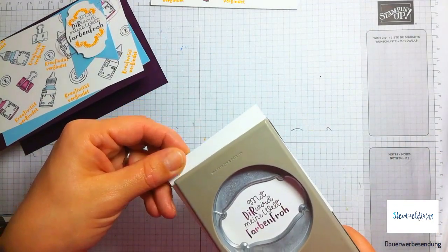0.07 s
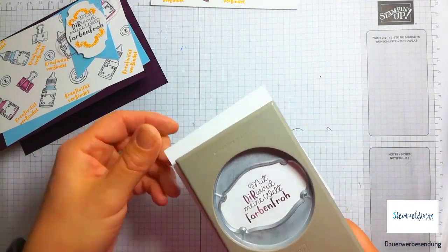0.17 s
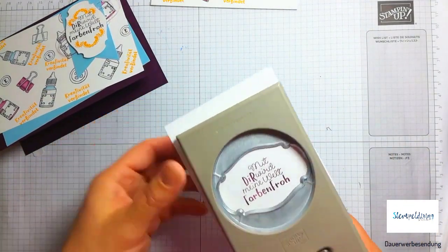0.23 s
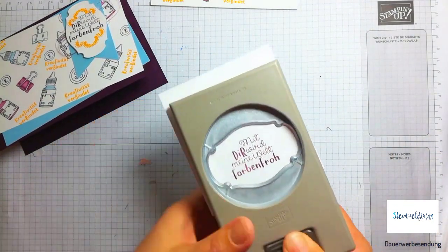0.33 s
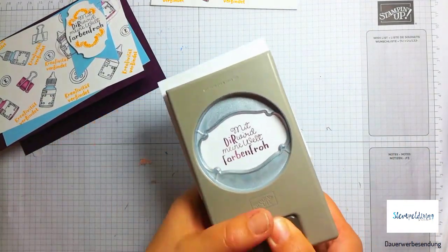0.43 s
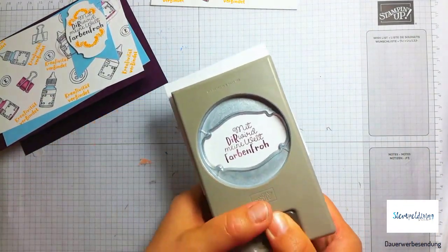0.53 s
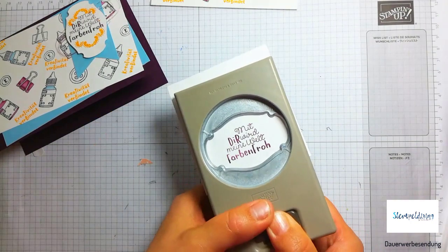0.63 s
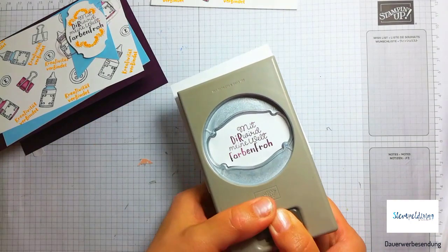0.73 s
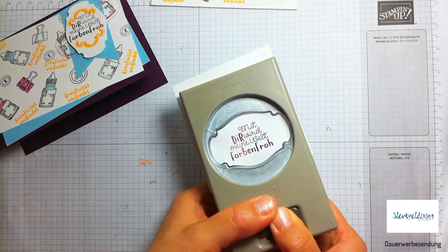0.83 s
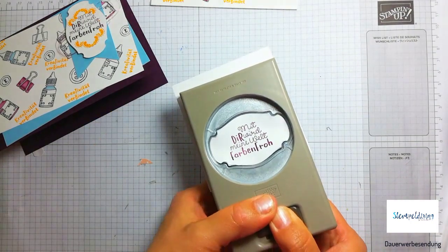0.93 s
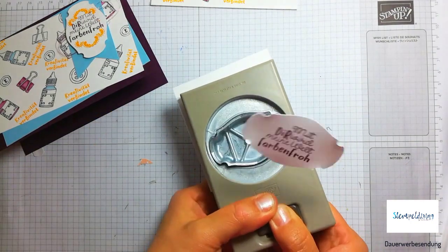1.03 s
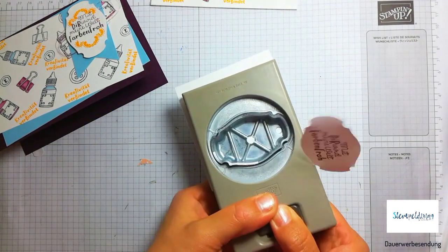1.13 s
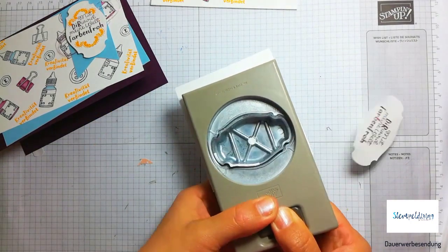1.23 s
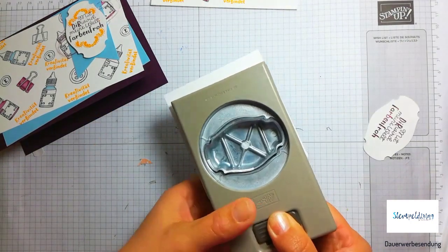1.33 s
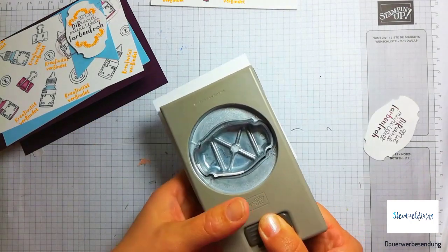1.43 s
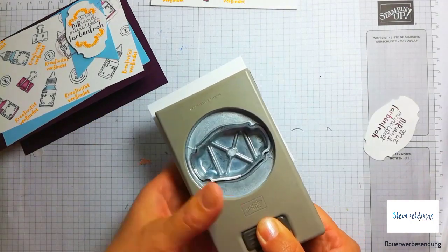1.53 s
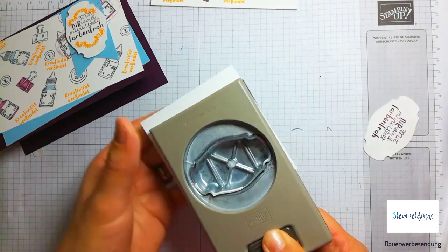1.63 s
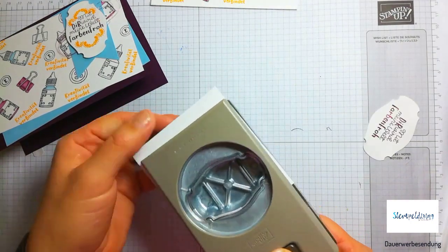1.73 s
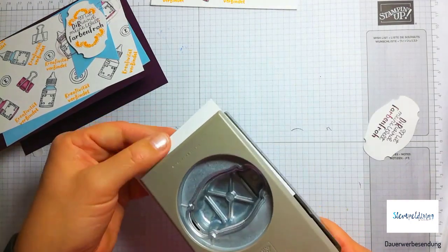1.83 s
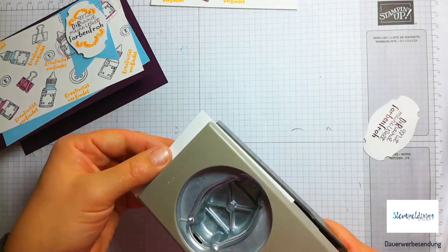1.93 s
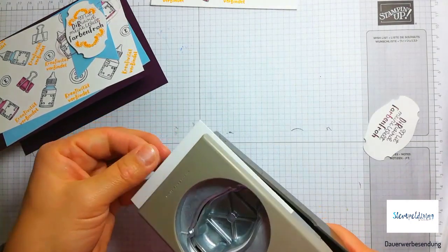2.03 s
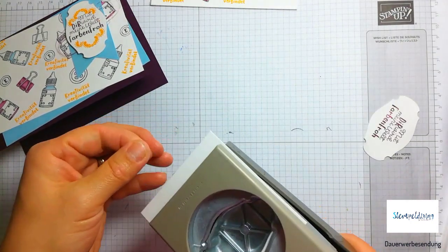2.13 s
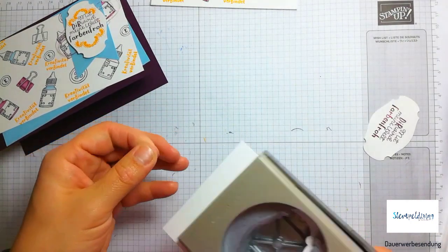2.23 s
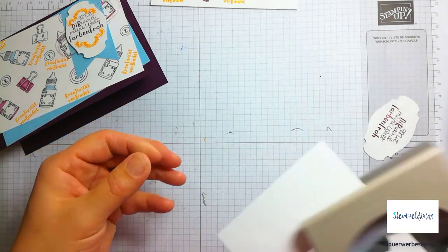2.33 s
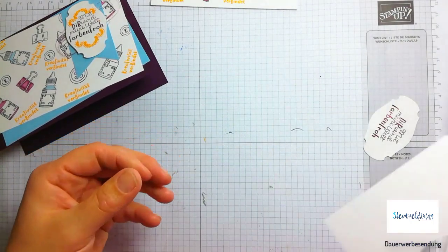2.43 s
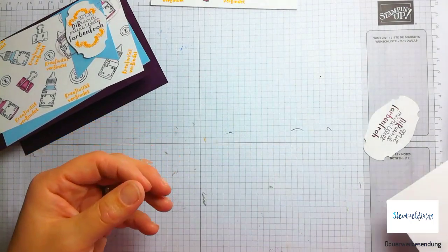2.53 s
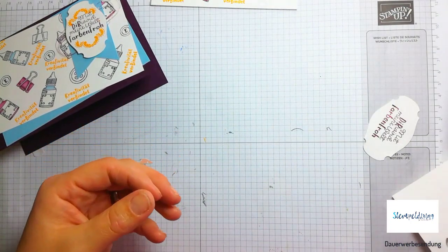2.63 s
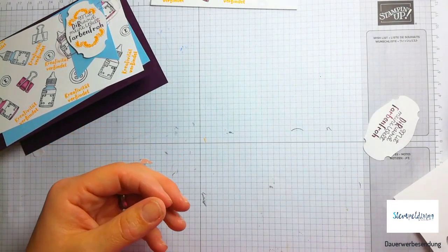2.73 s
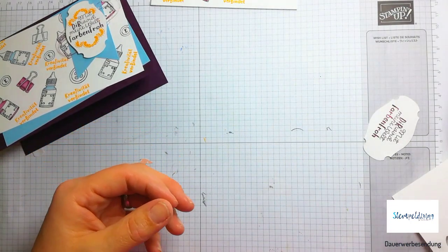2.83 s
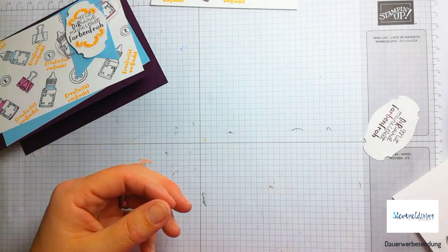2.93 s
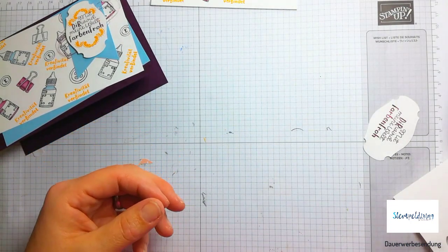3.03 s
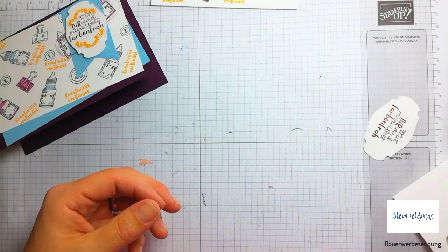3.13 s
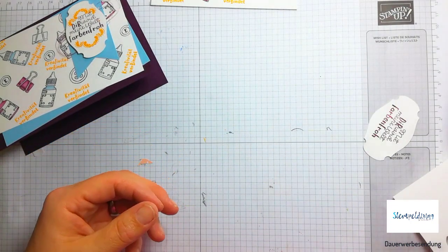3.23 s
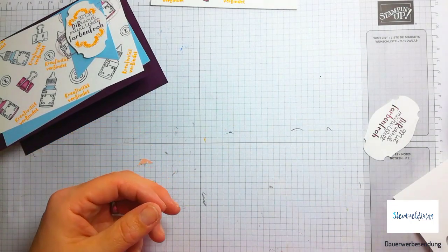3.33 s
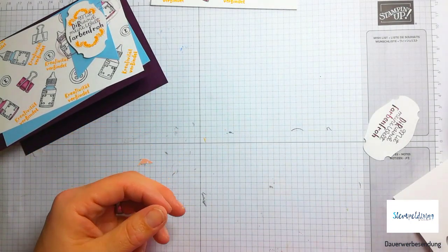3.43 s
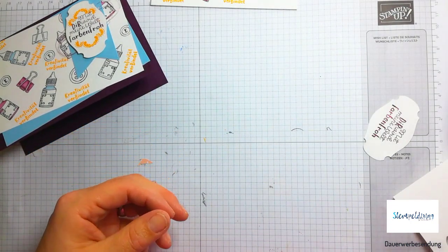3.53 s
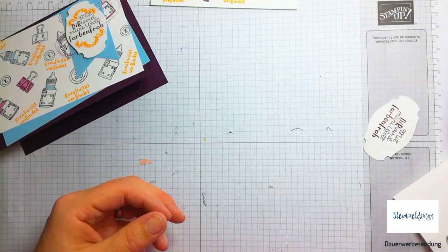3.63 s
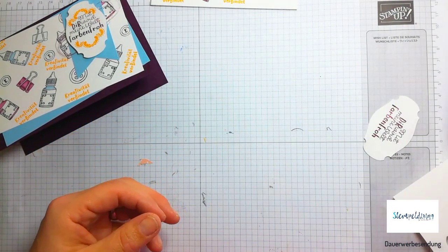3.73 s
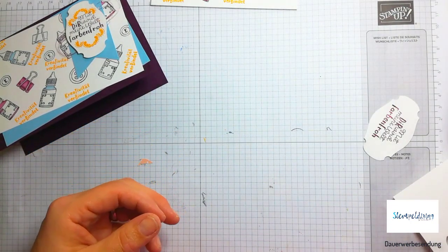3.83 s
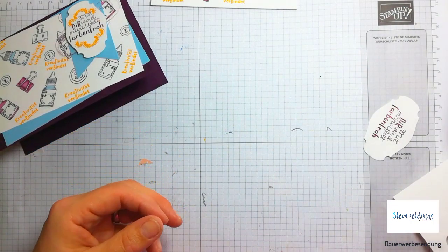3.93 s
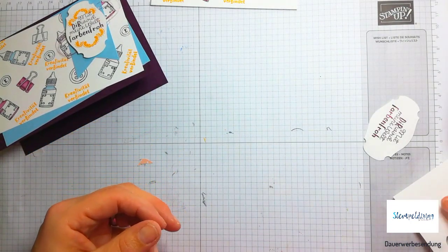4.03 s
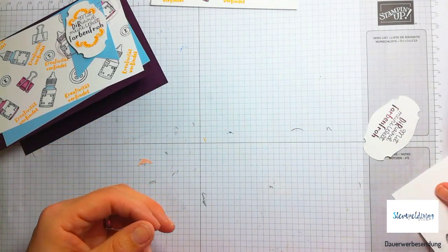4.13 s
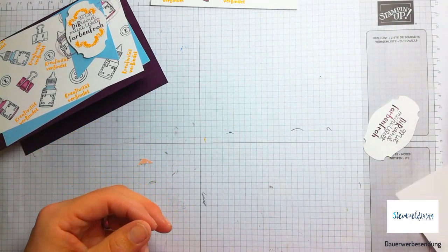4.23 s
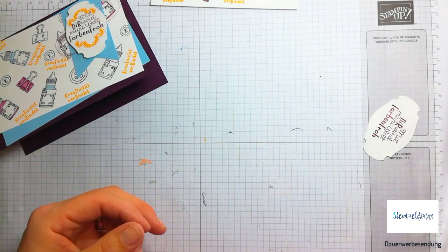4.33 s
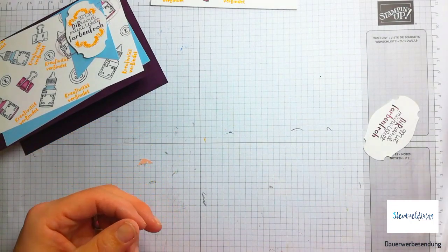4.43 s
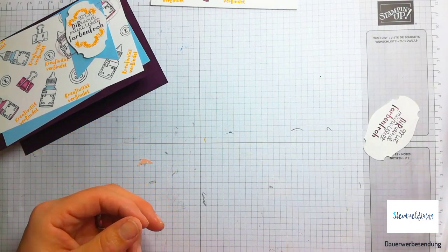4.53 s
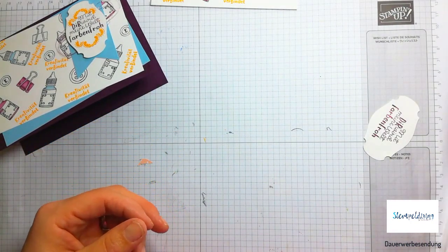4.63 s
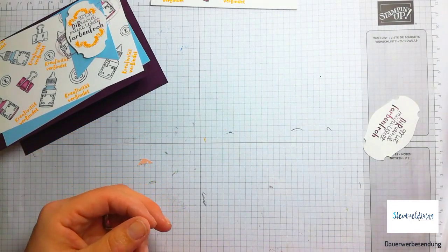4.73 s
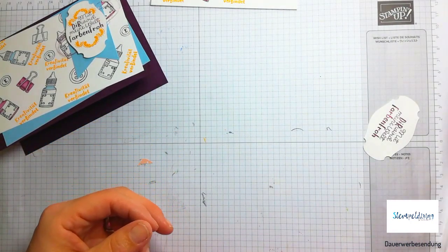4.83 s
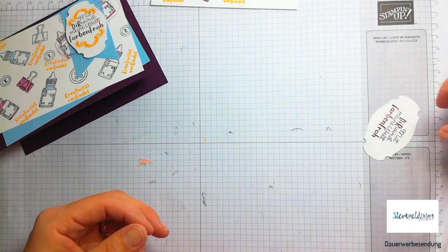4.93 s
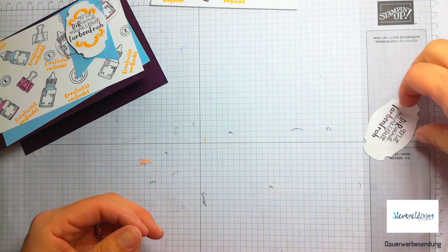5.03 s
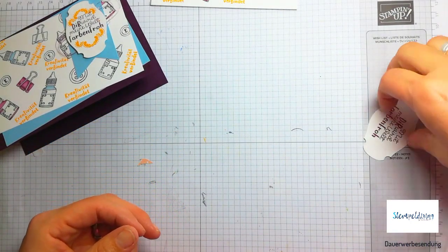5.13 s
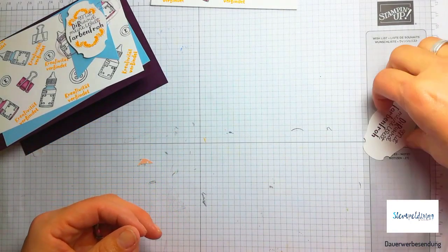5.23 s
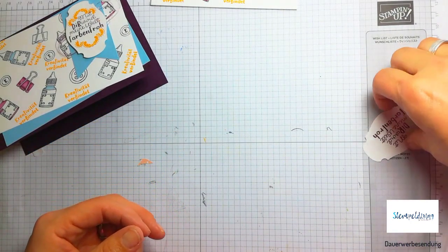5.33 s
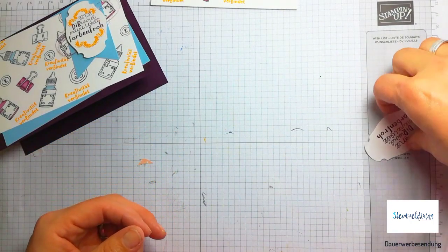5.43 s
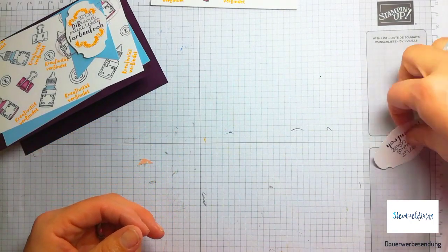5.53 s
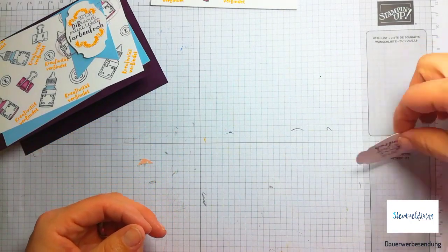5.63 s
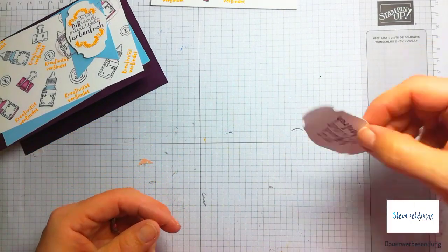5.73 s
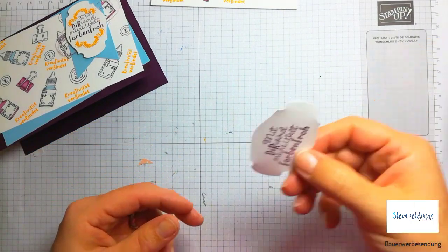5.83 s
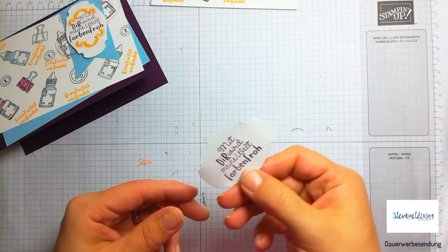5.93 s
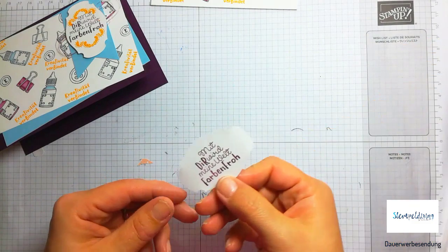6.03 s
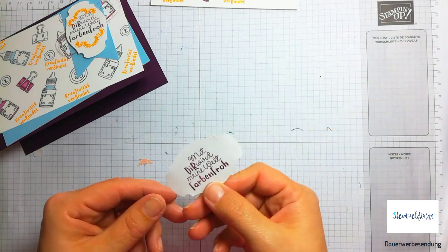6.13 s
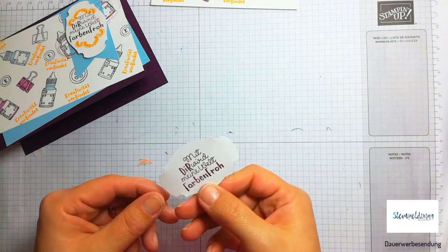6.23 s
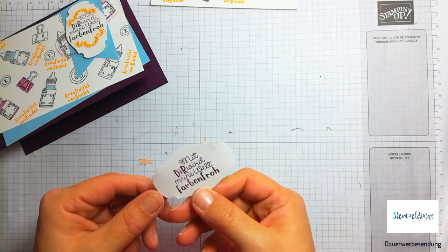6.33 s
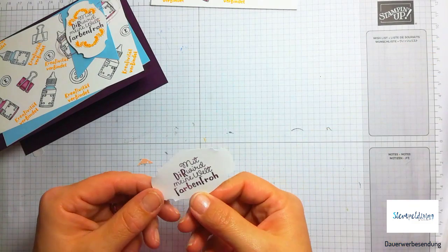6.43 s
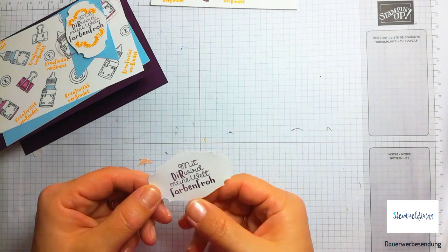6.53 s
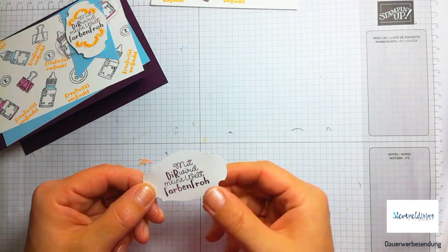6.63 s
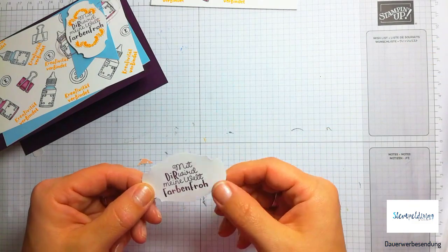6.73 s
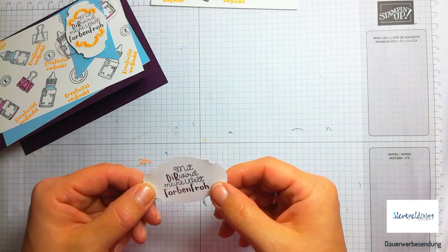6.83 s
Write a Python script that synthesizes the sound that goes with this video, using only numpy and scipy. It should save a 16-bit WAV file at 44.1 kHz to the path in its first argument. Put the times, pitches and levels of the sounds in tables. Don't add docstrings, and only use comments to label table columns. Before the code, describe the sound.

Stepped crackling, one sharp metallic snap with a brief spring ring, papery scrapes, a wobbling set-down on wood, card flicks, and faint fingertip rubbing in a quiet room.

```python
import sys
import numpy as np
from scipy import signal
from scipy.fft import rfft, irfft
from scipy.io import wavfile
from scipy.ndimage import uniform_filter1d

SR = 44100
rng = np.random.default_rng(int(sys.argv[2]) if len(sys.argv) > 2 else 0)


def put_to_file(sound):
    columns = np.atleast_2d(sound).T
    safe = np.clip(columns, -1, 1)
    whole_steps = np.round(safe * 32767)
    wavfile.write(sys.argv[1], SR, whole_steps.astype(np.int16))


def invert_db(x):
    u = np.asarray(x, float) / 20
    return 10 ** u


N = 303849
TIME = np.arange(N) / SR


def drift(rate_hz):
    points = rng.standard_normal(int(N / SR * rate_hz) + 2)
    return np.interp(TIME * rate_hz, np.arange(len(points)), points)


def resonance(x, hz, width_hz):
    r = np.exp(-np.pi * width_hz / SR)
    b = [(1 - r * r) / 2, 0, (r * r - 1) / 2]
    a = [1, -2 * r * np.cos(2 * np.pi * hz / SR), r * r]
    return signal.lfilter(b, a, x + 1e-18)


def ring(clicks, hz, t60_s):
    r = invert_db(-60 / (t60_s * SR))
    w = 2 * np.pi * hz / SR
    return signal.lfilter([0, np.sin(w)], [1, -2 * r * np.cos(w), r * r], clicks + 1e-18)


def struck(times_s, levels_db, modes, soft_hz):
    push = np.zeros(N)
    push[(np.array(times_s) * SR).astype(int)] = invert_db(np.array(levels_db))
    push = signal.lfilter(*signal.butter(1, soft_hz, fs=SR), push)
    return sum(invert_db(db) * (-1) ** k * ring(push, hz, t60_s) for k, (hz, db, t60_s) in enumerate(modes))


def above(x, hz):
    return signal.sosfilt(signal.butter(4, hz, "high", fs=SR, output="sos"), x)


def grit(grain_db):
    shared, own = rng.standard_normal(N), rng.standard_normal((2, N))
    x = (shared + 1.8 * own) * invert_db(grain_db * rng.standard_normal(N))
    return x / x.std()


def body(force, modes, gain):
    busy = np.flatnonzero(np.abs(force[0]) > 1e-9)
    part = slice(busy[0], busy[-1] + SR // 10)
    out = np.zeros((2, N))
    for k, (hz, width_hz, db) in enumerate(modes):
        driven = force[:, part] * invert_db(db) * gain(hz)[part]
        out[:, part] += (-1) ** k * resonance(resonance(driven, hz, width_hz), hz, 2 * width_hz)
    return out


COLOUR_HZ = [800, 1700, 3700, 9000]


def colour_db(hz, weight_db, edge_db, low_mid):
    bass, mid, _, treble = [np.interp(np.log(hz), np.log(COLOUR_HZ), row) for row in np.eye(4)]
    share, offset_db = low_mid
    top = treble * max(hz / 9000, 1) ** .8
    return bass * weight_db + mid * (share * weight_db + offset_db) + top * edge_db


def cracks(events, modes, low_mid, grain_db):
    s, peak_db, weight_db, edge_db, ms = np.transpose(sorted(events))
    owner = np.maximum(np.searchsorted(s, TIME) - 1, 0)
    age = (TIME - s[owner]) / (np.maximum(ms, .3) / 1000)[owner]
    force = grit(grain_db) * invert_db(peak_db)[owner] * np.exp(-np.abs(age)) * (age > 0)

    def gain(hz):
        chance_db = rng.standard_normal(len(s))
        return invert_db(colour_db(hz, weight_db, edge_db, low_mid) + chance_db)[owner]

    return body(force, modes, gain)


def friction(strokes, modes, low_mid, surge_db, edge_db, steady=()):
    stroke_depth_db, pointed, flat = 29, 1.2, 5
    slow_sheen = .14
    s, rise_s, fall_s, peak_db, weight_db = np.transpose(list(strokes) + list(steady))[:, :, None]
    rounding = np.array([pointed] * len(strokes) + [flat] * len(steady))[:, None]
    t = TIME[::32]
    away = np.where(t < s, (s - t) / np.maximum(rise_s, .002), (t - s) / np.maximum(fall_s, .002))
    each_db = peak_db - stroke_depth_db * away ** rounding
    owner, level_db = each_db.argmax(0), each_db.max(0)
    sheen_db = edge_db + slow_sheen * np.minimum(peak_db[owner, 0] - level_db, 40)
    weight_db = uniform_filter1d(weight_db[owner, 0], size=20)
    level_db, sheen_db, weight_db = [np.interp(TIME, t, c) for c in (level_db, sheen_db, weight_db)]
    force = grit(grain_db=2.5) * invert_db(level_db + surge_db * drift(120)) * (level_db > -115)
    return body(force, modes, lambda hz: invert_db(colour_db(hz, weight_db, sheen_db, low_mid) + 2.5 * drift(30)))


def placed(x, pan_db, lag_samples, treble_left):
    x = x * invert_db(np.array([[pan_db / 2], [-pan_db / 2]]))
    x = x + treble_left * np.array([[1], [-1]]) * above(x, hz=4991)
    return np.array([np.roll(x[0], lag_samples), x[1]])


# (frequency [Hz], width [Hz], level [dB])
RUMBLE = [(28.8, 7.8, -9.5), (52.8, 16, -3.5), (119, 32, -2.5), (133.5, 4.3, -3.5), (171, 12, -4.5),
          (254.5, 130, -21.5)]
# (time [s], rise [dB], half length [s])
SHIFTS = [
    (0.135, 9, 0.13),
    (0.9, 8, 0.1),
    (1.78, 9, 0.13),
    (2.606, 7, .35),
    (3.19, 16, .06),
    (3.357, 13.5, .12),
    (3.697, 6.5, 0.41),
    (5.427, 4.5, 0.54),
    (6.8, 3.5, .5),
]


def rumble():
    out = np.zeros((2, N))
    swell_db = -6.5 + sum(db * np.exp(-((TIME - s) / half_s) ** 2) for s, db, half_s in SHIFTS)
    for hz, width_hz, db in RUMBLE:
        shared, own = rng.standard_normal(N), rng.standard_normal((2, N))
        mode = resonance(resonance(shared + hz / 700 * own, hz, width_hz), hz, 2 * width_hz)
        level_db = db + swell_db * np.clip(hz / 110, 0, 1) + 2 * drift(1.5)
        out += invert_db(level_db) * invert_db(-66.0) * mode / mode.std()
    return out


# (frequency [Hz], density [dB per Hz])
HISS = [(180, -30.5), (300, -7.5), (526, -8.5), (696, -6.5), (756, -9), (1560, -9.5), (9760, -15),
        (11900, -13.5), (12900, -21.5), (15500, -36)]


def hiss():
    hz = np.maximum(np.fft.rfftfreq(N, 1 / SR), 1)
    knot_hz, knot_db = np.transpose(HISS)
    colour = invert_db(np.interp(np.log(hz), np.log(knot_hz), knot_db))
    noise = irfft(rfft(rng.standard_normal((2, N))) * colour, N)
    return invert_db(-84 + 6.5 + .5 * drift(1.3)) * noise / noise.std()


# (frequency [Hz], t60 [s], level [dB])
ROOM = [(300, 0.088, -6), (830, 0.32, -7.5), (2000, 0.065, -10.5), (4200, 0.26, -7), (8500, 0.25, -7),
        (12953, 0.33, -15)]


def room(x):
    t = np.arange(SR // 2) / SR
    tail = np.zeros((2, len(t)))
    for hz, t60_s, db in ROOM:
        noise = rng.standard_normal(tail.shape) + 700 / hz * rng.standard_normal(len(t))
        band = resonance(noise / noise.std(), hz, 2.2 * hz) * invert_db(-60 * t / t60_s)
        band *= np.clip(t / 0.012, 0, 1)
        tail += invert_db(db) * band / np.sqrt(t60_s * SR / 14)
    return signal.fftconvolve(x[None], tail, axes=1)[:, :N]


# (time [s], upper modes [dB], lowest modes [dB])
THUMPS = [
    (1.002, -40.5, -46),
    (3.012, -33, -36.5),
    (3.021, -42, -70),
    (3.051, -46, -41.5),
    (3.171, -34.5, -57),
    (3.203, -35, -53),
    (3.351, -39, -60),
    (4.13, -62, -84),
    (4.262, -58, -85),
]
# (frequency [Hz], level [dB], t60 [s])
DESK_LOW = [(127, -1.5, .2), (147, -4, 0.45)]
DESK_HIGH = [(200, -7, 0.079), (274, 0.5, 0.084), (367, -3.5, 0.065), (418.5, -8, 0.045)]


def desk():
    s, upper_db, lowest_db = np.transpose(THUMPS)
    top = struck(s, upper_db, DESK_HIGH, soft_hz=350) + struck(s, lowest_db, DESK_LOW, soft_hz=500)
    puff = struck(s[:1], [-34.0], [(55.4, 0.1, .05), (95, -1.5, .06)], soft_hz=300)
    return above(top, hz=85.41) + puff


# (fastest [s], speeding up [s], slowing down [s], level [dB], weight [dB])
PICKUP = [
    (5.24, .08, .3, -72, 18),
    (5.334, 0.21, 0.16, -67, 9),
    (5.42, 0.033, .04, -63, 0.1),
    (5.47, 0.051, .025, -63, 11),
    (5.535, 0.096, 0.1, -54.5, 5.5),
    (5.672, 0.069, 0.01, -51, 1.5),
    (5.7, 0.018, .17, -82, 3),
]
# (frequency [Hz], width [Hz], level [dB])
PIECE = [(3440, 2120, 0.5), (4810, 880, 12), (5946, 1550, 5.5), (7307, 1970, 6), (9900, 1500, 2.5),
         (12700, 3300, 0), (1980, 1630, -12)]


def pickup():
    return friction(PICKUP, PIECE, low_mid=(1, 4.35), surge_db=2.4, edge_db=-0.4)


# (frequency [Hz], level [dB])
SHEET = [(260, -14), (560, -9.5), (900, 2), (1600, 6.5), (3600, 3.5), (6500, 2.5), (10000, 0.5),
         (12500, -5), (14500, -10.5)]


def sheet(count=25):
    pitches_hz = np.geomspace(260, 14300, count)
    knot_hz, knot_db = np.transpose(SHEET)
    levels_db = np.interp(np.log(pitches_hz), np.log(knot_hz), knot_db)
    return [(hz, 7.28 / count * hz, db) for hz, db in zip(pitches_hz, levels_db)]


# (time [s], peak [dB], weight [dB], edge [dB])
FLICKS = [(1.3107, -34, -40, 4.5), (1.3183, -28.5, -46, -14), (1.6637, -41, -14.5, -12.5),
          (1.6837, -51, -19, -19), (1.732, -26.5, -13, -15.5), (1.8368, -33, -3, 1), (2.361, -32, -37, -12),
          (2.6204, -33, -41.5, -11.5), (2.671, -32, -9, -10.5), (2.682, -40, -26.5, -17),
          (2.7382, -29, -21, -34.5), (2.7543, -33.5, -17, -29), (4.115, -44, -17.5, -24),
          (4.1283, -27, 3.5, -29), (4.1347, -32.5, -6.5, -34), (4.2209, -37, -30, -12.5),
          (4.234, -27.5, -13, 3), (4.2616, -57, -1, -9.5), (4.684, -33, -5, -3.5), (4.6934, -29.5, -3, -5),
          (5.2393, -48.5, -29.5, -24), (5.6402, -37.5, -43, -4.5), (5.6665, -36, -46.5, -1),
          (6.4094, -48.5, -17, -5.5)]
# (fastest [s], speeding up [s], slowing down [s], level [dB], weight [dB])
SLIDES = [
    (0.402, 0.085, 0.13, -64, -12),
    (1.83, 0.18, 0.082, -42, 4),
    (2.69, 0.036, 0.032, -50.5, -1.5),
    (2.738, 0.0061, 0.069, -50, -3),
    (3.656, .025, .05, -70.5, -11),
    (4.126, 0.045, .14, -47, -3.5),
    (4.256, 0.11, 0.13, -48, -3.5),
    (4.692, 0.015, 0.091, -35, -6.5),
    (2.625, 0.024, 0.069, -51.5, -17),
]
# (middle [s], speeding up [s], slowing down [s], level [dB], weight [dB])
PULLS = [
    (1.735, 0.077, 0.19, -46, -0.5),
    (2.37, .12, 0.095, -46.5, -8),
]


def card():
    flick_ms = 3.0
    out = cracks([(*flick, flick_ms) for flick in FLICKS], sheet(), (0.78, -.5), grain_db=1.0)
    return out + friction(SLIDES, sheet(), (1, 4.35), surge_db=2.5, edge_db=-3.0, steady=PULLS)


# (time [s], peak [dB], weight [dB], edge [dB], length [ms])
KNOCKS = [
    (3.014, -31, 2, -46, 1.45),
    (3.021, -34, 0.5, -26, 2.3),
    (3.1686, -41.5, 9.5, -62, 4.6),
    (3.2044, -51, 12.5, -35, 4.3),
    (3.3491, -60.5, 33.5, -14, 1.4),
]
# (frequency [Hz], width [Hz], level [dB])
RESTING = [(744, 130, 8.5), (1000, 102, 13.5), (1360, 640, 5.5), (1762, 176, 9.5), (2120, 510, 11),
           (2430, 410, 10.5), (2760, 237, 13), (3300, 1020, 2.5), (4146, 2000, 2.5), (6150, 3200, -28.5),
           (9050, 2100, -25)]


def knocks():
    return cracks(KNOCKS, RESTING, low_mid=(0.22, 5.6), grain_db=4.5)


# (time [s], low ring [dB], high ring [dB])
JUMPS = [
    (0.617, -70.5, -38),
    (0.638, -59, -49),
    (0.754, -69, -37),
    (1.985, -92, -50.5),
    (2.037, -76.5, -49),
]


def lever():
    s, low_db, high_db = np.transpose(JUMPS)
    low = struck(s, low_db + 19, [(469.3, 0.1, .11)], soft_hz=895)
    return low + struck(s, high_db + 9.5, [(1425, 0.1, 0.026)], soft_hz=3000)


# (frequency [Hz], level [dB], t60 [s])
SPRING = [(1186, -43, .62), (1204, -49, .45), (2250, -60, .4)]


def spring():
    return struck([1.003], [-4.0], SPRING, soft_hz=9000) + struck([3.41], [-21.0], SPRING[2:], soft_hz=9000)


# (frequency [Hz], level [dB], t60 [s])
STOP = [(1080, -4, 0.075), (1570, -8.5, 0.021), (1840, -9, 0.011)]


def stop():
    return above(struck([1.0028], [-6.0], STOP, soft_hz=9000), hz=518)


# (frequency [Hz], width [Hz], level [dB])
PUNCH = [(287, 180, -6), (480, 80, -2.5), (1060, 100, -0.5), (1130, 230, 1), (1374.2, 470, 2.5),
         (1590, 33, -1), (1950, 35, 0.5), (2340, 200, -4.5), (2580, 50, -0.5), (3920, 200, -2.5),
         (4601, 130, -2.5), (6700, 1600, -1), (7260, 83, -0.5), (9830, 400, -3.5)]
# (frequency [Hz], width [Hz], level [dB])
LEVER = [(512, 260, -1), (1527, 200, 2.5)]


def cast(broad_db):
    return PUNCH + [(hz, width_hz, db + broad_db) for hz, width_hz, db in sheet(count=15)] + LEVER


# (fastest [s], speeding up [s], slowing down [s], level [dB], weight [dB])
CREAKS = [
    (0.59, .1, .04, -69, 11),
    (0.618, 0.017, .02, -46, 4.5),
    (0.694, .2, .04, -51, -2.5),
    (0.782, .02, .1, -41, -1.5),
    (0.935, 0.027, 0.0062, -53.5, -7),
    (1.995, 0.0059, .14, -56, 3),
    (2.085, 0.17, .04, -58, 2.5),
]


def creaks():
    return friction(CREAKS, cast(broad_db=1.0), low_mid=(0.49, -1), surge_db=4.5, edge_db=-2.5)


# (time [s], peak [dB], weight [dB], edge [dB], length [ms])
BITES = [(0.616, -31.5, -2.5, 5.5, 8.1), (0.6383, -28, -4.5, -13, 4.1), (0.6604, -46, 2, -37, 13),
         (0.6843, -33.5, -2, -19, 12), (0.7523, -29, -6, -3, 13), (0.7805, -24, 2, -6.5, 2.5),
         (0.8084, -32, -10, -15.5, 3.8), (0.8226, -36, -15, -4, 10.5), (0.8813, -31.5, -6, -4.5, 7.1),
         (0.938, -28.5, -10, -10, 6.8), (0.9444, -33.5, -13, -0.5, 8.6), (0.9623, -31.5, -10, -8, 2.6),
         (0.966, -29, 9, 5, 2.1), (1.1945, -51, 6, -38, 4), (1.9837, -39.5, -0.5, -13.5, 2.84),
         (2.0216, -42, 8, -20.5, 3.8), (2.0365, -37.5, 5.5, -23.5, 3.3), (2.099, -28, -16, -28, 1.17)]


def bites():
    return cracks(BITES, cast(broad_db=2.5), low_mid=(.6, -0.55), grain_db=3.5)


# (time [s], peak [dB], weight [dB], edge [dB], length [ms])
SNAP = [
    (0.9912, -29.5, -9, -4, 6.2),
    (0.9944, -6, -5, -7, 2),
    (0.9966, -3, -9.5, -8.5, 3.0),
    (1.0028, -3, 0, -9, 1.4),
    (1.0052, -4.5, -7.5, -5.5, 2.8),
    (1.0088, -9, -4.5, -11.5, 3.7),
    (1.0128, -12.5, -6, 0, 1.5),
    (1.0205, -21.5, -3.5, -2.5, 19),
]


def snap():
    return cracks(SNAP, cast(broad_db=5.0), low_mid=(.8, 4.4), grain_db=3.5)


def suppress(x, faint_db):
    _, _, cells = signal.stft(x, SR, nperseg=512)
    power = uniform_filter1d(np.abs(cells) ** 2, size=5, axis=1)
    power = uniform_filter1d(power, size=3, axis=2).mean(0)
    cells = cells * power / (power + invert_db(faint_db) ** 2)
    return signal.istft(cells, SR, nperseg=512)[1][:, :N]


def scene():
    punch = bites() + snap() + creaks()
    metal = spring() + lever() + stop()
    paper = card() + pickup()
    knocking, thumps = knocks(), desk()
    near = placed(punch + metal, -1.5, lag_samples=4, treble_left=.3)
    near += placed(paper, -1.1, lag_samples=10, treble_left=.01)
    near += placed(knocking + thumps, -1.2, lag_samples=26, treble_left=.01)
    wet = near.mean(0) + invert_db(3.5) * knocking.mean(0) + invert_db(-8.5) * thumps
    return suppress(near + room(wet), faint_db=-100.0) + rumble() + hiss()


def top_cut(x):
    return signal.sosfilt(signal.butter(12, 16480, fs=SR, output="sos"), x)


def record(dry):
    rounded = .96 * np.tanh(dry / .96)
    return top_cut(rounded)


dry = scene()
out = record(dry)
put_to_file(out)
```